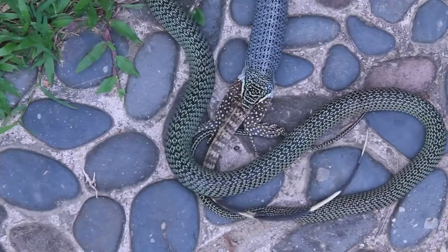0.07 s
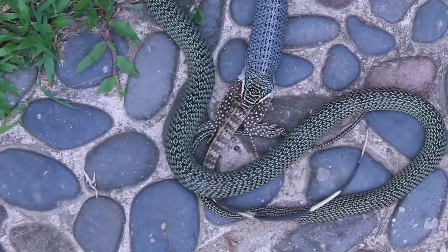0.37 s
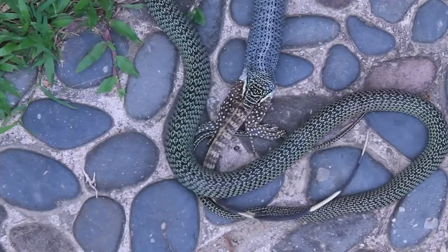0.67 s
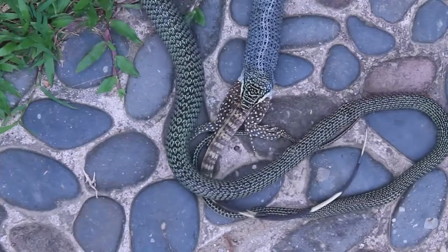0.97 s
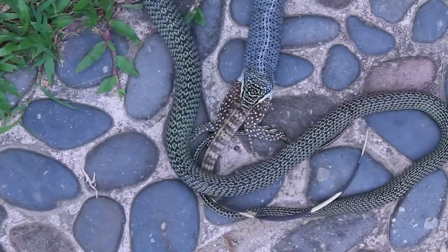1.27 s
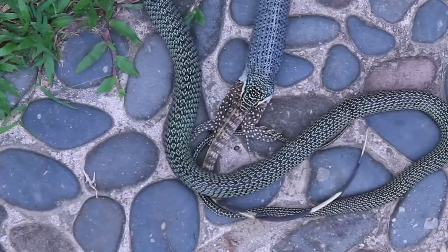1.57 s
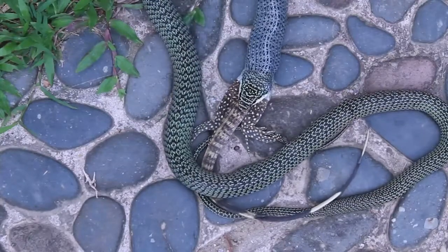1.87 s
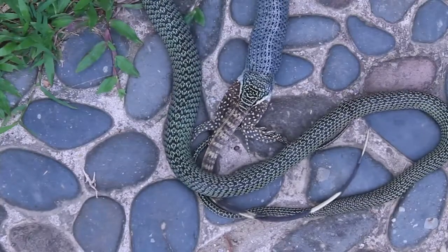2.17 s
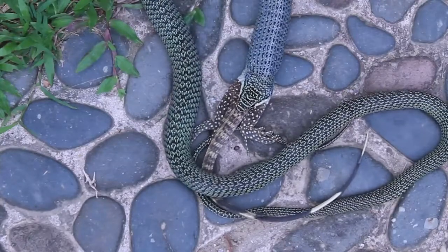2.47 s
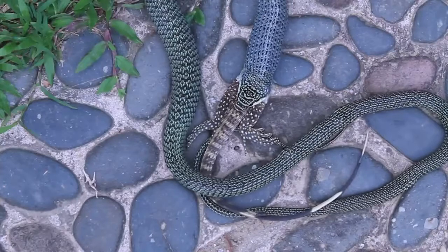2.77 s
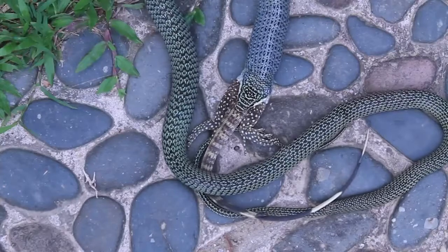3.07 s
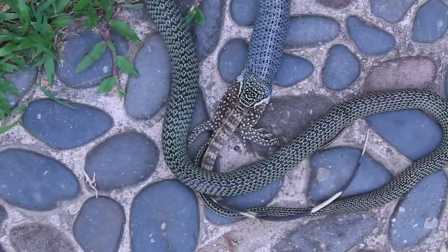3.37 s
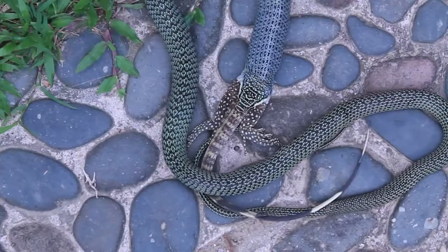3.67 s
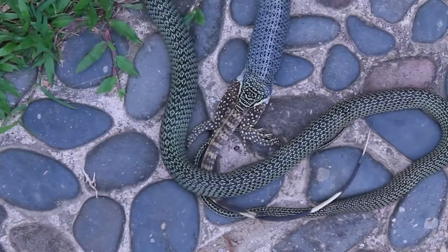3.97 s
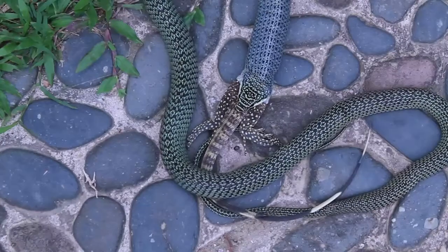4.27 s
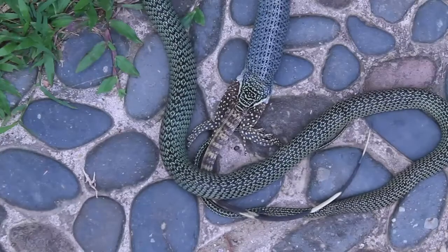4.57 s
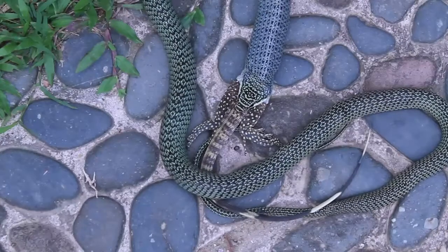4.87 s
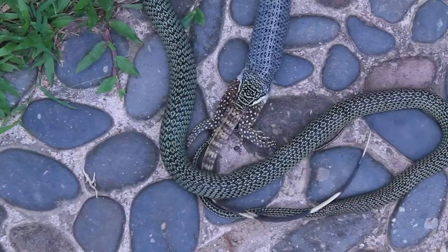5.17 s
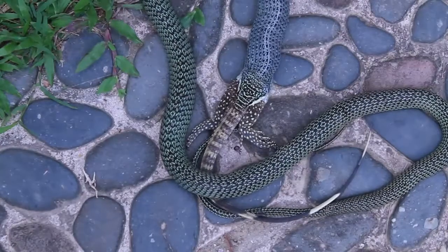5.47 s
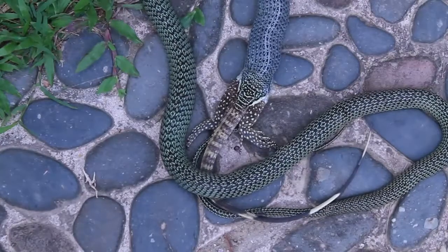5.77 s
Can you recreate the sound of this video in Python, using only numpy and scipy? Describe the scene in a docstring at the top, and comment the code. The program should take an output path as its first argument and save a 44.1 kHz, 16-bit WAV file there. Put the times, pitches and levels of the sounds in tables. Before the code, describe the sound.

Outdoors, over a steady hiss with a faint hum, a small engine sputters quietly. At about 0.4 seconds it winds up close by in a loud, raspy, insect-like buzz, climbing in pitch to a peak near 1 second, then drops a gear and fades. Two quick throttle blips follow around 1.3 seconds, among a few dry ticks. From 1.5 to 2.4 seconds it revs in short rising bursts farther off, with a slight echo. From 2.5 seconds it holds a thin, distant drone that slowly weakens and lifts slightly in pitch around 4.5 seconds. Soft, gritty knocks and scuffs on stone paving come between 2 and 4.5 seconds, the clearest near 3.1, with a faint rustle at 4. Tiny high chirps appear at the start, near 1.6 and after 5 seconds. One bright, tick-like squeak sounds at about 5.6 seconds.

```python
"""Outdoors on paving, a small, high-revving engine buzzes like a giant insect: it winds up close by,
drops a gear and fades, revs twice more farther off among echoes, then holds a thin distant drone.
Each firing is a pulse and a puff of gas that ring the exhaust; an open throttle adds crack and sizzle.
Around it: outdoor hiss, soft knocks, scuffs and rustles on the stones, tiny chirps and one squeak."""
import sys
import numpy as np
from scipy import signal
from scipy.fft import rfft, irfft
from scipy.io import wavfile
from scipy.ndimage import uniform_filter1d

SR = 44100
rng = np.random.default_rng(int(sys.argv[2]) if len(sys.argv) > 2 else 0)


def unload_wav(signal):
    """Save mono or channel-first audio to the path in sys.argv[1] as 16-bit WAV at rate SR, clipped to [-1, 1]."""
    wavfile.write(
        sys.argv[1],
        SR,
        np.round(np.clip(np.atleast_2d(signal).T, -1, 1) * 32767).astype(np.int16),
    )


N = 261072
T = np.arange(N) / SR


def gain_of(db):
    """Decibels to amplitude."""
    return 10 ** (np.asarray(db) / 20)


def unit_rms(x):
    """Scales a sound to rms 1."""
    return x / np.sqrt(np.mean(x ** 2) + 1e-20)


def add(mix, s, sound):
    """Mixes a sound in at s seconds."""
    part = mix[max(round(s * SR), 0):][:len(sound)]
    part += sound[:len(part)]


def colour(x, points):
    """Minimum-phase EQ through (Hz, dB) points; the result has rms 1."""
    hz, db = np.transpose(points)
    f = abs(np.fft.fftfreq(4096, 1 / SR))
    log_gain = np.log(gain_of(np.interp(np.log(f + 1), np.log(hz + 1), db)))
    taps = np.fft.ifft(np.exp(np.conj(signal.hilbert(log_gain)))).real[:2048]
    return unit_rms(signal.fftconvolve(x, taps)[:len(x)])


def wander(n, rate_hz):
    """Smooth random drift of rms 1."""
    f = np.fft.rfftfreq(n + SR, 1 / SR)
    spectrum = rfft(rng.standard_normal(n + SR)) * np.exp(-(f / rate_hz) ** 2)
    return unit_rms(irfft(spectrum, n + SR))[:n]


def lowpass(x, hz):
    """Low-pass without delay."""
    return signal.sosfiltfilt(signal.butter(4, hz, fs=SR, output="sos"), x)


def resonate(x, hz, width_hz):
    """A resonance of gain 1 that follows the curve hz."""
    carrier = np.exp(2j * np.pi * np.cumsum(hz) / SR)
    pole = np.exp(-np.pi * width_hz / SR)
    return 2 * (carrier * signal.lfilter([1 - pole], [1, -pole], x / carrier)).real


def echoes(x, t60):
    """Scattered reflections from paving, walls and plants."""
    t = T[:SR // 2]
    taps = rng.standard_normal(len(t)) * (rng.random(len(t)) < 2000 / SR)
    taps *= gain_of(-60 * t / t60) * (t > .003)
    return signal.fftconvolve(x, taps / np.linalg.norm(taps))[:len(x)]


def ground_bounce(x, delay_s=0.000678, sway=0.13, share=0.36):
    """The paving returns a late copy; its lag drifts as the source moves, shifting a hollow colour."""
    at = np.arange(len(x))
    lag = SR * delay_s * (1 + sway * wander(len(x), 5.0))
    return x + share * np.interp(at - lag, at, x)


def air(hiss_db=-49, swell_db=.7):
    """Outdoor hiss with a faint wavering hum."""
    # The EQ of the hiss. Each row: frequency in Hz, relative level in dB.
    hiss_eq = [(35, -90), (60, -50), (423, -21), (657, -9.5), (738, -9.5), (829, -8.5), (1020, -3.5),
               (1120, -3.5), (1350, -2), (1630, -4.5), (2050, -2), (2840, -8), (5980, -9.5), (6560, -8),
               (15500, -14)]
    # The tones of the hum. Each row: frequency in Hz, level in dB.
    hum_tones = [(748, -64.5), (1510, -62), (585, -73.5)]
    out = gain_of(hiss_db + swell_db * wander(N, 4.5)) * colour(rng.standard_normal(N), hiss_eq)
    for hz, db in hum_tones:
        level = gain_of(db + 1.7 * wander(N, 3.3))
        out += level * np.sin(2 * np.pi * np.cumsum(hz + 5 * wander(N, 14.3)) / SR)
    return out


def chirps(warble=0.042, faint_db=-52):
    """Short warbling whistles, with fainter twitter between them toward the end."""
    # Each row: start and length in seconds, first and last pitch in Hz, peak level in dB.
    clear = [(0.101, 0.014, 5600, 7530, -39.5), (0.125, 0.014, 3080, 2860, -44),
             (0.206, 0.061, 8250, 7750, -51), (1.61, 0.02, 7400, 7400, -42), (1.621, 0.01, 5510, 5360, -36),
             (4.985, 0.03, 5950, 5510, -48), (5.503, 0.025, 5700, 4840, -43),
             (5.546, 0.021, 5900, 6580, -42.5)]
    faint = []
    for when, pitch, glide, loudness in rng.random((18, 4)):
        hz = 4400 + 2000 * pitch
        faint.append((5.0 + 1.7 * when, .016, hz, hz + 900 * (glide - .5), faint_db + 4 * loudness))
    out = np.zeros(N)
    for s, length, start_hz, end_hz, db in clear + faint:
        n = int(length * SR)
        wobble = uniform_filter1d(rng.standard_normal(n), size=64) * np.sqrt(64)
        hz = np.linspace(start_hz, end_hz, n) * (1 + warble * wobble)
        add(out, s, gain_of(db) * np.hanning(n) * np.sin(2 * np.pi * np.cumsum(hz) / SR))
    return out + gain_of(-3) * echoes(out, t60=.15)


def squeak(length_s=0.0095, hz=2560, db=-25, wobble=0.065):
    """One very short, bright squeak, heard almost as a tick."""
    n = int(length_s * SR)
    turns = np.cumsum(hz * (1 + wobble * wander(n, 677))) / SR
    partials_db = [1, 6, 7, 1.5, 6, 6]
    tone = sum(gain_of(d) * np.cos(2 * np.pi * k * turns) for k, d in enumerate(partials_db, 1))
    return gain_of(db) * unit_rms(tone) * np.hanning(n) ** 2


def rustles():
    """Something dry slides over the stones: ticks and uneven, swelling hiss."""
    # Each row: start and length in seconds, level in dB, centre in Hz.
    slides = [(1.147, 0.0054, -33, 2982), (1.165, 0.011, -33.5, 3450), (1.407, 0.01, -33, 3000),
              (1.466, 0.0068, -36.5, 2340), (3.972, 0.25, -48.5, 4670), (5.252, 0.017, -49.5, 2380)]
    out = np.zeros(N)
    for s, length, db, hz in slides:
        n = int(length * SR)
        hiss = unit_rms(signal.lfilter(*signal.iirpeak(hz, Q=1.8, fs=SR), rng.standard_normal(n)))
        add(out, s, gain_of(db + 0.94 * wander(n, 80)) * np.hanning(n) * hiss)
    return out


def knocks(trim_db=-7, attack_s=0.0012, knock_t60=0.083, scuff_t60=0.18, scuffs_per_s=14):
    """Dull, gritty pushes on stone, each with its own broad resonance; softer scuffs fall between."""
    # The clear knocks. Each row: start in seconds, level in dB before the trim, centre in Hz.
    clear = [(1.886, -39, 626), (1.967, -38.5, 900), (2.239, -32.5, 960), (2.28, -33, 804),
             (2.333, -30.5, 744), (2.364, -39, 1014), (3.103, -27.5, 1200), (3.547, -35.5, 746),
             (3.638, -37, 970), (3.693, -40, 520), (3.801, -38.5, 1100)]
    # Spells of scuffing. Each row: start and end in seconds, level in dB before the trim.
    scuffing = [(1.892, 2.15, -41), (3.113, 3.42, -46.5), (3.549, 4.02, -46), (4.403, 4.58, -54.5)]
    # The EQ of the grit. Each row: frequency in Hz, relative level in dB.
    grit_eq = [(40, -43), (100, -19), (200, -16), (400, -2.5), (900, 6.5), (1500, 3.5), (2500, -2.5),
               (6000, -35)]
    hits = [(*row, knock_t60) for row in clear]
    for start, end, db in scuffing:
        for s in np.arange(start, end, 1 / scuffs_per_s):
            late, louder, octaves = rng.random(3) - .5
            hits.append((s + late / scuffs_per_s, db + 6 * louder, 720 * 2 ** octaves, scuff_t60))
    out, t = np.zeros(N), T[:SR // 4]
    for s, db, hz, t60 in hits:
        grit = colour(rng.standard_normal(len(t)), grit_eq)
        body = unit_rms(signal.lfilter(*signal.iirpeak(hz, Q=2.5, fs=SR), grit))
        envelope = gain_of(db + trim_db - 60 * t / t60) * (1 - np.exp(-t / attack_s))
        add(out, s, envelope * (0.98 * grit + 0.41 * body))
    return out


def flutter():
    """A low, noisy flutter at the height of the close rev."""
    # The fader. Each row: time in seconds, level in dB.
    fader = [(.73, -100), (.745, -61.5), (.9, -53.5), (.97, -58.5), (1.08, -63), (1.11, -100)]
    # Its bass-heavy EQ. Each row: frequency in Hz, relative level in dB.
    flutter_eq = [(15, 4), (45, -10), (120, -9), (300, -10), (600, -7), (1200, -34)]
    level = gain_of(np.interp(T, *np.transpose(fader), left=-140, right=-140))
    return level * colour(rng.standard_normal(N), flutter_eq)


def drone(fade_db=2.0, waver=0.00226, blur=0.17):
    """The distant engine: each partial fades by itself; the colour shifts as it speeds up and moves on."""
    # Each row: time in seconds, firing rate in Hz, level in dB.
    course = [(2.501, 341.6, -52), (2.621, 333.8, -48.5), (2.95, 333.6, -48), (3.25, 331, -46),
              (3.7, 336.3, -47.5), (4.25, 332, -50), (4.46, 336.2, -50.5), (4.701, 351.8, -52.5),
              (5.25, 353, -54.5), (5.92, 352, -53)]
    # The EQ before and after speeding up. Each row: frequency in Hz, relative level in dB.
    slow_eq = [(670, -28), (1000, -5), (1350, 1), (1670, 4), (2000, -2), (2300, 2.5), (3000, -10.5),
               (3400, -3.5), (4400, -14), (6600, -8.5), (7200, -20), (8300, -9), (9500, -24), (11300, -18)]
    fast_eq = [(700, -13), (1050, -3.5), (1500, 6.5), (2150, 4), (2500, 2), (2900, -6.5), (3500, 0.5),
               (4100, -16), (4600, 3), (5200, -10), (5700, -6), (7000, 2), (8000, -3), (9000, -3.5),
               (12000, -4)]
    speed_up_s = (4.12, 4.67)
    bounce_s = np.array([0.000595, 0.000873])  # lag of the ground reflection before and after
    s, hz, db = np.transpose(course)
    hz = np.interp(T, s, hz)
    turns = np.cumsum(hz * (1 + waver * wander(N, 26.1))) / SR
    slow_t, out = np.linspace(0, T[-1], 40), np.zeros(N)
    for k in range(2, 35):
        f = k * np.interp(speed_up_s, T, hz)
        bounce_db = 20 * np.log10(abs(1 + .45 * np.exp(2j * np.pi * f * bounce_s)))
        eq_db = [np.interp(f[0], *np.transpose(slow_eq)), np.interp(f[1], *np.transpose(fast_eq))]
        partial_db = np.interp(slow_t, speed_up_s, eq_db + bounce_db)
        fading = gain_of(partial_db + fade_db * rng.standard_normal(len(slow_t)))
        out += np.interp(T, slow_t, fading) * np.cos(2 * np.pi * (k * turns + rng.random()))
    out = unit_rms(out * (1 + blur * wander(N, 63)))
    return out * gain_of(np.interp(T, s, db, left=-120))


def firing(hz, throttle, rough, jitter=0.0308, steady_gas=0.87):
    """One sharp pulse a firing, each of its own size, and a puff of gas noise after it."""
    n = len(hz)
    turns = np.cumsum(hz * (1 + jitter * rough * wander(n, 251.2))) / SR + 0.287
    nearest = np.rint(turns).astype(int)
    scatter_db = np.interp(throttle, [0, 1], [2, 0.37]) * (1.36 + rough)  # rattly shut, even wide open
    size = gain_of(scatter_db * rng.standard_normal(n)[nearest])
    lag = (turns - nearest) / hz * SR  # samples from the nearest firing
    pulses = unit_rms(size * np.sinc(lag) * np.exp(-(lag / 8) ** 2))
    puffs = unit_rms((steady_gas + np.exp(-(turns % 1))) * rng.standard_normal(n))
    return pulses, puffs


def exhaust(drive, pipe_hz, opening, voice, width_hz=660):
    """The exhaust colours the firings and, except in a short burst, rings at its moving resonance."""
    # Its EQ with the throttle nearly shut, wide open, from afar, and in a rounder close burst.
    # Each row: frequency in Hz, relative level in dB.
    shut_eq = [(150, -101), (300, -42), (500, -23), (800, -13.5), (1150, -8.5), (1800, -2.5), (2450, -1),
               (2900, -1.5), (4300, 4), (5500, -8), (7500, -25.5), (11000, -32.5), (15500, -30)]
    open_eq = [(180, -86), (350, -33), (500, -43), (700, -6), (1000, 0.5), (1450, 2.5), (2000, 12.5),
               (3000, 5.5), (4600, 12), (5600, 3.5), (6900, -8.5), (7900, -17), (11500, -15.5),
               (15500, -30)]
    far_eq = [(240, -62), (400, -35), (600, -24), (1000, -10.5), (1500, -6), (2050, 1), (2700, -7),
              (3500, -4), (4600, 1), (5900, -4.5), (7000, 0), (7900, -1), (10000, -1.5), (11800, -3),
              (15500, -12.5)]
    burst_eq = [(200, -68), (500, -31), (900, -23), (1400, -12), (1900, 1), (2600, -9.5), (3700, -6.5),
                (4500, -5), (5200, -16.5), (7500, -13.5), (15500, -22)]
    if voice == "burst":
        return colour(drive, burst_eq)
    if voice == "far":
        tone = colour(drive, far_eq)
        return tone + 0.9 * resonate(tone, 1.12 * pipe_hz, width_hz)
    tone = (1 - opening) * colour(drive, shut_eq) + opening * colour(drive, open_eq)
    return tone + 6.3 * (1 - 0.81 * opening) * resonate(tone, pipe_hz, width_hz)


def engine(controls, voice="near", mid_rate_hz=366, edge_s=0.0013):
    """Firings ring the exhaust; an open throttle adds crack and sizzle, distance smears the pulses."""
    s, *columns = np.transpose(controls)
    t = np.arange(s[0], s[-1], 1 / SR)
    hz, pipe_db, throttle, rough = (np.interp(t, s, c) for c in columns)
    rough = np.clip(rough, .02, .95)
    # Crack, then sizzle, in dB against the pipe band at the middle rate: throttle shut, wide open.
    ranges = {"near": [(-10.5, 8.6), (-6, -3)],
              "far": [(-0.6, 11.3), (-8, 3.4)],
              "burst": [(-5, 7.4), (-14.5, -6)]}
    crack_db, sizzle_db = (shut + (wide - shut) * throttle for shut, wide in ranges[voice])
    sizzle_db += 14.5 * throttle * np.log2(hz / mid_rate_hz)
    opening = np.clip((crack_db + 4.5) / 9, 0, 1)
    pipe_hz = 1654 * (hz / mid_rate_hz) ** 0.5 * (1 + 0.25 * throttle)  # hotter gas rings higher
    pulses, puffs = firing(hz, throttle, rough)
    pulses = ground_bounce(pulses) + gain_of(-3) * echoes(pulses, t60=0.018)
    if voice == "far":
        for delay_s in (.0011, .0017, .0029, .0043):
            pulses = ground_bounce(pulses, delay_s, sway=0.034, share=0.21)
    pulses = unit_rms(pulses)
    # Pipe, crack and sizzle: the higher the band, the more of it is gas noise.
    noisiness = [.6, .85, 1.8] if voice == "far" else [.5, 1.25, 3.8]
    out = np.zeros(len(t))
    for i, db in enumerate([pipe_db, pipe_db + crack_db, pipe_db + sizzle_db]):
        drive = (1 - rough) * pulses + noisiness[i] * rough * puffs
        tone = exhaust(drive, pipe_hz, opening, voice)
        low, low_and_mid = lowpass(tone, 2700), lowpass(tone, 7000)
        band = (low, low_and_mid - low, tone - low_and_mid)[i]
        running_rms = np.sqrt(abs(uniform_filter1d(band ** 2, size=900)) + 1e-12)
        out += gain_of(db) * band / running_rms
    return -out * np.clip(np.minimum(t - s[0], s[-1] - t) / edge_s, 0, 1)


def coasting(s, length, hz, db, throttle, rough, sag=.23, fade_db=15):
    """Engine controls off the throttle: the rate sags, the level fades and the firing roughens."""
    return [(s + u * length, hz * (1 - sag * u ** 0.6), db - fade_db * u,
             throttle * (1 - 0.31 * u), rough + .3 * u) for u in np.linspace(0, 1, 5)]


def rev(length, start_hz, end_hz, start_db, end_db, throttle, coast_s, catch_s=0.062, attack_s=0.0057):
    """Farther off, the throttle opens, the rate glides, and the engine coasts again."""
    rough = 0.22 + 0.7 * np.exp(-length / catch_s)  # a short rev is rougher: no time to catch
    start = (0, start_hz, start_db, 0.8 * throttle, rough + 0.14)
    pull = engine([start] + coasting(length, coast_s, end_hz, end_db, throttle, rough), "far")
    return pull * np.minimum(T[:len(pull)] / attack_s, 1)


def blip(length, hz, db, end_hz, coast_s, throttle=0.44, catch_rough=0.33, coast_rough=0.35):
    """The engine catches for a few firings, then coasts down."""
    shape = [(0, -8.5), (.35, 0), (.75, -2.5), (1, -6)]  # share of the length, dB against the peak
    catch = [(u * length, hz, db + offset_db, throttle, catch_rough) for u, offset_db in shape]
    handover = (length / 2, hz, db - 12, 0, coast_rough)
    tail = coasting(length + .005, coast_s, end_hz, db - 2, 0, coast_rough)
    out = np.zeros(SR // 3)
    add(out, 0, engine(catch, "burst"))
    add(out, length / 2, engine([handover] + tail))
    return out


def stumbles(width_s=0.0087):
    """The engine's gain dips where a few firings are weak."""
    # Each row: time in seconds, depth in dB.
    dips = [(.613, 7.6), (.683, 4.3), (.941, 6)]
    return gain_of(-sum(db * np.exp(-((T - s) / width_s) ** 2) for s, db in dips))


def ride():
    """The engine ticks over, winds up and drops a gear close by, then revs and cruises farther off."""
    # Engine controls for three stretches. Each row: time in seconds, firing rate in Hz,
    # pipe band level in dB, throttle and roughness from 0 to 1.
    idle = [(0, 205, -49.5, .2, 0.5), (.24, 212, -48, 0.21, 0.72), (.29, 200, -54.5, .25, 1),
            (0.409, 196, -54, 0.65, 0.97)]
    wind_up = [(.412, 194.8, -43.5, 0.46, 0.32), (.434, 227.5, -35.5, 0.4, 0.16),
               (.506, 237, -36, 0.26, 0.21), (.6, 303, -32, 0.38, 0.31), (.685, 376.9, -29.5, 0.58, 0.25),
               (.745, 451.8, -29.5, 0.86, 0.52), (.845, 470.4, -27.5, 1, 0.2), (.895, 498, -24.5, .9, 0.23),
               (0.935, 503.7, -22, 0.74, 0.37), (.957, 534.5, -24.5, 1, 0.16),
               (.985, 352, -23.5, 0.74, 0.2), (1.018, 341, -26, 0.97, 0.25), (1.066, 348.7, -28, 0.92, 0.2),
               (1.1, 339.2, -27, 0.57, 0.12), (1.107, 335.8, -32.5, 0, 0.52), (1.21, 292.7, -37.5, 0, 0.3),
               (1.3, 266, -41.5, 0.16, 0.18)]
    cruise = [(2.4, 325, -44, 0.16, 0.44), (2.508, 352.8, -41, 0.19, 0.42), (2.63, 339.4, -49.5, 0.37, .42),
              (3.01, 332.7, -55, 0.55, 0.4), (3.049, 337, -64, 0.37, 0.45)]
    # Revs farther off. Each row: start and length in seconds, first and last firing rate in Hz,
    # first and last pipe band level in dB, throttle from 0 to 1, coasting time in seconds.
    far_revs = [(1.561, 0.14, 284, 415.6, -52, -39, 0.48, 0.059),
                (1.756, 0.015, 368, 383, -42, -43.5, 0.37, 0.064),
                (1.814, 0.014, 371, 388, -48, -42.5, 0.33, 0.057),
                (1.86, 0.025, 355, 365, -48, -50, 0.58, 0.059),
                (1.913, 0.025, 357, 376, -53, -47.5, 0.69, 0.043),
                (1.955, .095, 350, 347, -48.5, -44.5, 0.36, .04),
                (2.053, 0.12, 344, 546, -45, -38, 0.91, 0.096),
                (2.225, .158, 337.4, 448, -42, -44, 0.87, 0.0343)]
    # Close throttle blips. Each row: start and length in seconds, firing rate in Hz,
    # peak pipe band level in dB, rate reached in Hz, coasting time in seconds.
    close_blips = [(0.024, 0.025, 226, -47.5, 229, 0.032), (0.067, 0.019, 296.6, -43.5, 272, 0.031),
                   (0.348, .026, 208, -40, 210.5, .04), (1.301, .013, 342, -27, 347, 0.04),
                   (1.363, 0.025, 305.4, -30.5, 406, .16)]
    out = np.zeros(N)
    for controls, voice in [(idle, "near"), (wind_up, "near"), (cruise, "far")]:
        add(out, controls[0][0], engine(controls, voice))
    for s, *settings in far_revs:
        add(out, s, rev(*settings))
    for s, *settings in close_blips:
        add(out, s, blip(*settings))
    return out * stumbles()


def scene(low_cut_hz=170):
    """The engine near, leaving and distant, with the small sounds around it."""
    motor, low_flutter = ride(), flutter()
    mix = motor + gain_of(-21) * echoes(motor, t60=0.21) + drone() + knocks() + chirps() + rustles()
    add(mix, 5.639, squeak())
    thinned = signal.sosfilt(signal.butter(3, low_cut_hz, "highpass", fs=SR, output="sos"), mix)
    return (thinned + low_flutter + air())[None]


def record(dry):
    """Soft overload rounds off the tallest pulses; a steep low-pass trims the top."""
    ceiling, cutoff_hz = .76, 15780
    rounded = dry / (1 + (dry / ceiling) ** 4) ** (1 / 4)
    taps = signal.firwin(511, cutoff_hz, window=("kaiser", 9), fs=SR)
    return signal.oaconvolve(rounded, taps[None], "same")


dry = scene()
out = record(dry)
unload_wav(out)
```